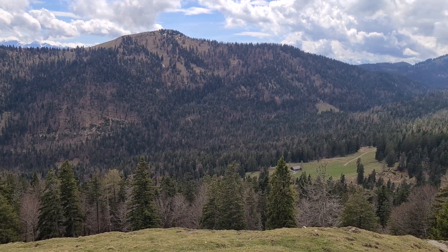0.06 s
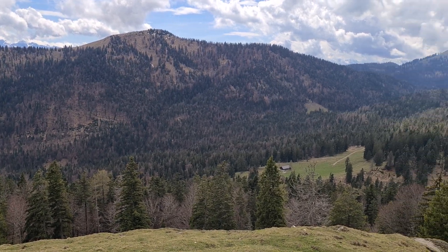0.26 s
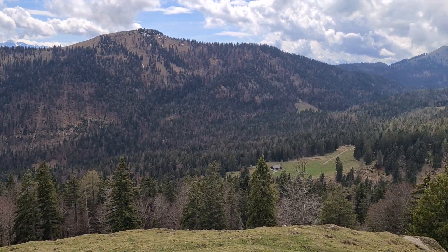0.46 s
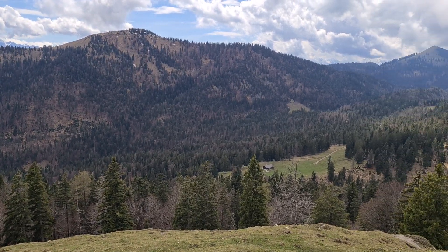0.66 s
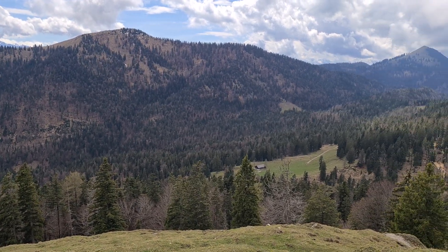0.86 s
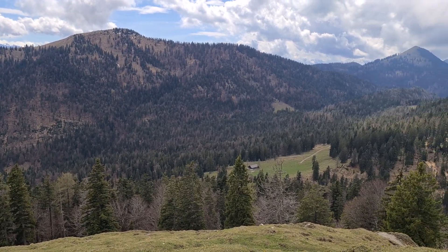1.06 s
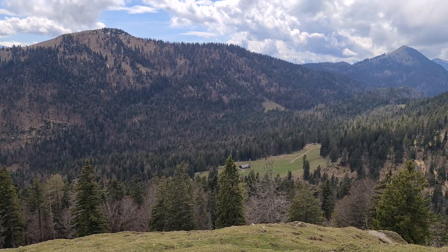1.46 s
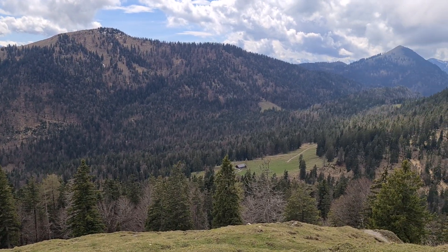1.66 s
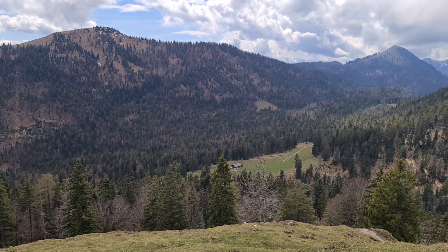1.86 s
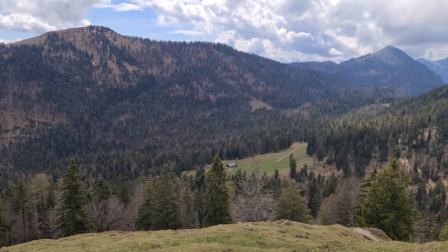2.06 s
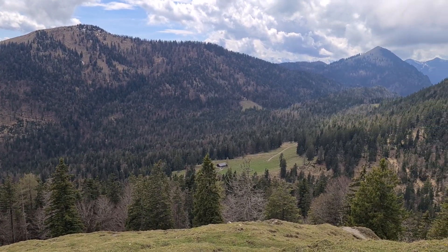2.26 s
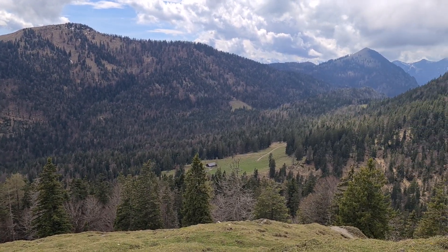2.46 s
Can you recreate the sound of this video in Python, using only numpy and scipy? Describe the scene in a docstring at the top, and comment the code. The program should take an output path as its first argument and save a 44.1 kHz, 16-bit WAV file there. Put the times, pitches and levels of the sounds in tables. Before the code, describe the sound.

Gusty wind rumbles and thumps on the microphone, with a few sharp clicks.

```python
"""An open mountainside. Wind gusts hit the two ports (sound openings) of a hand-held microphone,
mostly the left one, and make it rumble and thump. Three sharp clicks, some faint ticks, a few dull
knocks and a tiny crackle, probably from handling the casing, sound close to the right port.
Far away, a few small birds chirp faintly over the soft rush of the forest below and a steady hiss."""
import sys
import numpy as np
from scipy import signal
from scipy.fft import rfft, irfft
from scipy.io import wavfile
from scipy.ndimage import uniform_filter1d

SR = 44100
rng = np.random.default_rng(int(sys.argv[2]) if len(sys.argv) > 2 else 0)


def transcribe(signal):
    """Save signal, clipped to [-1, 1], as a 16-bit WAV file at the path in sys.argv[1]."""
    frames = np.atleast_2d(signal).T
    limited = np.clip(frames, -1, 1)
    pcm = np.round(limited * 32767).astype(np.int16)
    wavfile.write(sys.argv[1], SR, pcm)


N = 110250   # 2.5 seconds


def wind():
    """Gusts make each port rumble on its own; small swirls of air add a flutter on the left."""
    # How strong the rumble at each port and the flutter are over time: time_s, level_db
    left_gusts = [(0, -47.5), (.03, -37), (.11, -59.5), (.15, -51), (.185, -58), (.26, -64), (.305, -20),
                  (.335, -19.5), (.39, -35), (.53, -27), (.61, -28), (.7, -53.5), (.74, -41), (.79, -44),
                  (.86, -32), (.93, -36.5), (1.01, -33), (1.05, -21.5), (1.08, -20), (1.102, -49.5),
                  (1.125, -20.5), (1.155, -34), (1.22, -30.5), (1.31, -26.5), (1.46, -26.5), (1.55, -40),
                  (1.59, -31.5), (1.63, -32.5), (1.665, -41.5), (1.72, -23), (1.78, -50.5), (1.85, -22),
                  (1.97, -47), (2.07, -29), (2.18, -26.5), (2.22, -46.5), (2.33, -54.5), (2.36, -66),
                  (2.42, -53.5), (2.47, -66), (2.5, -69)]
    right_gusts = [(0, -49), (.24, -33), (0.329, -39), (.37, -51), (0.409, -32.5), (0.462, -37), (.51, -44),
                   (.6, -47.5), (.66, -30), (.71, -38.5), (.78, -37), (.83, -51.5), (.95, -37.5),
                   (1.13, -51.5), (1.21, -57), (1.33, -52), (1.37, -31.5), (1.44, -59), (1.49, -44),
                   (1.77, -54.5), (1.84, -42.5), (1.89, -46), (1.94, -32.5), (2.06, -69.5), (2.13, -37.5),
                   (2.2, -70), (2.29, -43), (2.32, -41.5), (2.36, -61), (2.42, -47), (2.47, -60),
                   (2.5, -69)]
    flutter_levels = [(0, -64), (.03, -75), (.07, -88), (.26, -92), (.32, -30.5), (.38, -39), (.47, -48.5),
                      (.59, -38), (.63, -74), (.7, -77), (.8, -71), (.86, -38.5), (.93, -79), (.97, -35.5),
                      (1.06, -36), (1.1, -66), (1.17, -28.5), (1.22, -94), (1.26, -37.5), (1.37, -38.5),
                      (1.41, -53.5), (1.45, -31.5), (1.54, -68), (1.59, -42.5), (1.67, -63), (1.715, -35),
                      (1.76, -82), (1.82, -47.5), (1.85, -36.5), (1.9, -78), (1.96, -78), (2.01, -46.5),
                      (2.06, -50), (2.085, -64), (2.11, -48), (2.19, -42.5), (2.24, -96), (2.5, -80)]
    # How strong their low and high pitches are: pitch_hz, level_db
    left_tone = [(15, -27.5), (30, -8.5), (50, -2), (68, -1.5), (95, -5), (130, -11.5), (190, -30),
                 (280, -42.5), (450, -63.5), (900, -100.5)]
    right_tone = [(15, -28), (30, -5.5), (50, -4), (68, 1.5), (92, -7.5), (120, -15.5), (190, -29),
                  (280, -51.5), (450, -59.5), (900, -98)]
    swirl_tone = [(50, -28), (100, 5.5), (160, 3), (230, -2.5), (320, -15), (450, -37.5), (650, -53),
                  (1100, -87)]
    left = level(left_gusts) * evened(noise(left_tone), share=1)
    right = level(right_gusts) * evened(noise(right_tone), share=1)
    swirls = evened(noise(swirl_tone), share=0.41)
    flicker = from_db(drift(rate_hz=56))   # about 1 dB up and down
    flutter = level(flutter_levels) * rms_one(swirls * flicker)
    return np.array([left + flutter, right])


def puffs():
    """Each puff of air pushes once on a port; a bigger swirl makes a rounder, duller thump."""
    # Single puffs: start_s, port (left or right), level_db, top_hz
    air_puffs = [(0.107, "right", 12, 158), (.13, "right", 3, 207), (.228, "right", 5, 186),
                 (0.323, "left", 11.5, 393), (0.345, "left", 3.5, 388), (0.406, "right", 7, 183),
                 (0.421, "left", -0.5, 361), (.443, "right", 10, 263), (0.527, "left", 13, 242),
                 (0.587, "left", 2.5, 331), (0.664, "right", 0.5, 188), (0.782, "right", -14.5, 473),
                 (0.974, "left", 7, 339), (1.035, "left", 1.5, 408), (1.071, "left", 8, 190),
                 (1.177, "left", -3.5, 320), (1.258, "left", 15.5, 212), (1.295, "left", 5, 268),
                 (1.344, "left", 0, 284), (1.362, "right", 4, 245), (1.452, "left", 11, 227),
                 (1.644, "right", -14, 472), (1.706, "left", 9.5, 261), (1.817, "right", -6.5, 275),
                 (1.939, "right", -9.5, 190), (2.069, "left", 15.5, 226), (2.103, "left", 9, 242),
                 (2.177, "left", 11, 215), (2.274, "right", -8, 310), (2.319, "right", -3, 230),
                 (2.417, "right", -9, 270)]
    pushes = np.zeros((2, N))
    for start_s, port, level_db, top_hz in air_puffs:
        side = int(port == "right")
        pushes[side] -= butter(impulses(start_s, level_db), top_hz, "low", order=6)
    return butter(pushes, hz=75, kind="high", order=2)


def clicks():
    """A hard tap snaps and makes the casing ring at two pitches for under a millisecond."""
    # Hard taps: start_s, snap_db, top_hz, ring_db, overtone_db
    taps = [(.2754, -14.5, 11100, -42, -34), (1.397, -31, 4500, -63, -79), (1.595, -29, 13800, -11.5, -28),
            (1.618, -47, 13900, -52, -45), (1.6971, -28, 5890, -22, -43)]
    # The casing's ring and its higher overtone: pitch_hz, width_hz
    casing_rings = [(6050, 1430), (11900, 5900)]
    contacts = sum(butter(impulses(start_s, snap_db), top_hz, "low", order=4)
                   for start_s, snap_db, top_hz, _, _ in taps)
    sound = butter(contacts, hz=[2570, 6850], kind="band", order=1)
    starts_s, _, _, ring_db, overtone_db = np.transpose(taps)
    for (pitch_hz, width_hz), level_db in zip(casing_rings, [ring_db, overtone_db]):
        ring = resonance(impulses(starts_s, level_db), pitch_hz, width_hz)
        sound -= resonance(ring, pitch_hz, width_hz)   # a second pass softens the ring's start
    return to_the_right(sound, left_db=-35)


def click_tails(click_sound):
    """A faint hiss lingers after each click."""
    # Tone of that hiss: pitch_hz, level_db
    tail_tone = [(1000, -6), (3000, -1.5), (6000, -10.5), (8000, -21), (10000, -10.5), (12000, -4.5),
                 (15500, 3)]
    left, right = (scattered(click_sound, tail_tone, fade_s=0.32) for _ in range(2))
    return from_db(-5.5) * np.array([from_db(-12) * left, right])


def knocks():
    """Soft bumps stir the low rings of the casing, which die out almost at once."""
    # Soft bumps: start_s, left_db, right_db, top_hz
    bumps = [(0.3606, -39, -15, 1800), (.385, -43, -10.5, 1440), (0.6651, -19, -11.5, 1700),
             (1.948, -50, -26.5, 2500)]
    # The rings they stir: pitch_hz, width_hz, level_db
    casing_rings = [(670, 340, -5), (1053, 320, -1.5), (3090, 3000, -6.5)]
    pushes = np.zeros((2, N))
    for start_s, left_db, right_db, top_hz in bumps:
        push = butter(impulses(start_s, 0), top_hz, "low", order=3)
        pushes += from_db([[left_db], [right_db]]) * push
    return -sum(from_db(level_db) * resonance(pushes, pitch_hz, width_hz)
                for pitch_hz, width_hz, level_db in casing_rings)


def crackle():
    """The grip slides on the casing in a few tiny, uneven slips, too soft to snap."""
    # The one short slide: start_s, length_s, level_db
    slide = (1.8131, .0042, -31)
    start_s, length_s, level_db = slide
    slips_per_s = 2000
    count = int(length_s * slips_per_s)
    times_s = start_s + length_s * (np.arange(count) + rng.random(count)) / count
    slips = impulses(times_s, level_db) * rng.choice([-1, 1], N)
    soft_slips = butter(slips, hz=5800, kind="low", order=8)
    sound = butter(soft_slips, hz=[900, 1800], kind="band", order=1)
    return to_the_right(sound, left_db=-27)


def birds():
    """Far birds sing thin, wavering tones that rise a little, swell and fade, blurred by the trees."""
    # Chirps: start_s, length_s, start_hz, end_hz, waver_hz, level_db
    chirps = [(.088, .028, 4230, 4290, 30, -70), (.96, .045, 3260, 3380, 120, -77),
              (1.0, .045, 3100, 3220, 170, -76), (1.045, .065, 3240, 3300, 190, -78.5)]
    t, song = np.arange(N) / SR, np.zeros(N)
    for start_s, length_s, start_hz, end_hz, waver_hz, level_db in chirps:
        progress = np.clip((t - start_s) / length_s, 0, 1)
        pitch_hz = start_hz + (end_hz - start_hz) * progress + waver_hz * drift(rate_hz=200)
        whistle = np.sqrt(2) * np.sin(2 * np.pi * np.cumsum(pitch_hz) / SR)
        swell = np.sin(np.pi * progress)
        song += from_db(level_db) * swell * whistle
    flat_tone = [(1, 0), (SR, 0)]   # the trees scatter all pitches alike
    left, right = (song + from_db(-2) * scattered(song, flat_tone, fade_s=0.35) for _ in range(2))
    return np.array([from_db(-1.5) * left, right])


def forest():
    """The far forest rushes smoothly, fading on the right as the microphone turns."""
    # Tone of the rush on each side: pitch_hz, level_db
    left_tone = [(100, -14), (400, -8), (620, -6.5), (820, 1), (1100, 2.5), (1400, 1), (1750, -4),
                 (2200, -9), (2700, -24.5), (6000, -56.5)]
    right_tone = [(100, -5), (400, -3.5), (620, -0.5), (800, -1.5), (1000, 4), (1350, -2), (1750, -4),
                  (2200, -7.5), (2700, -14.5), (6000, -47)]
    # Strength of the rush on the right: time_s, level_db
    right_levels = [(0, -61), (.6, -64), (.9, -66), (1.5, -67.5), (1.9, -69), (2.5, -67.5)]
    share, delay_s = 0.066, 0.00025   # this share of the right's power is the left's rush, a bit later
    t = np.arange(N) / SR
    left = noise(left_tone)
    delayed = np.interp(t - delay_s, t, left)
    right = np.sqrt(share) * delayed + np.sqrt(1 - share) * noise(right_tone)
    return np.array([from_db(-69.5) * left, level(right_levels) * right])


def hiss():
    """A steady high hiss, stronger on the right."""
    # Tone of the hiss on each side: pitch_hz, level_db
    left_tone = [(1000, -16), (2600, -1.5), (3500, 6), (4100, 3.5), (4800, 10.5), (5300, -13), (6600, 1.5),
                 (7800, -22), (10000, -15), (12500, -10.5), (16000, -17.5)]
    right_tone = [(1000, -9), (2600, -7), (3300, 3), (4750, 3.5), (5250, -1), (5800, 4), (6400, -4.5),
                  (7400, -23.5), (9000, -25.5), (11500, -15), (13500, -20), (16000, -22.5)]
    # Strength of the hiss on the right: time_s, level_db
    right_levels = [(0, -69), (1.2, -69.5), (2.5, -71)]
    return np.array([from_db(-81.5) * noise(left_tone), level(right_levels) * noise(right_tone)])


def from_db(db):
    """Turn decibels into a number to multiply a sound by."""
    return 10 ** (np.asarray(db) / 20)


def rms_one(x):
    """Scale a sound so that its average strength (rms) is 1."""
    return x / np.sqrt(np.mean(x ** 2) + 1e-20)


def level(curve):
    """A volume that glides through rows of time_s, level_db."""
    return from_db(np.interp(np.arange(N) / SR, *np.transpose(curve)))


def noise(tone):
    """Noise of strength 1, shaped by rows of pitch_hz, level_db."""
    pitch_hz, level_db = np.transpose(tone)
    all_hz = np.maximum(np.fft.rfftfreq(N, 1 / SR), 1)
    gains = from_db(np.interp(np.log(all_hz), np.log(pitch_hz), level_db))
    return rms_one(irfft(rfft(rng.standard_normal(N)) * gains, N))


def drift(rate_hz):
    """A random wander of about 1 either way; a higher rate wanders faster."""
    return rms_one(butter(rng.standard_normal(N + SR), rate_hz, "low", order=2)[SR:])


def evened(x, share, span_s=0.06):
    """Smooth away a share (0 to 1) of the slow swings in a noise's loudness."""
    power = np.abs(signal.hilbert(x)) ** 2
    for window_s in (span_s, span_s / 2):
        power = uniform_filter1d(power, int(window_s * SR))
    return rms_one(x / power ** (share / 2))


def butter(x, hz, kind, order):
    """Keep the low pitches, the high ones or a band; a higher order cuts more steeply."""
    return signal.sosfilt(signal.butter(order, hz, kind, fs=SR, output="sos"), x + 1e-18)


def resonance(x, pitch_hz, width_hz):
    """Ring at one pitch; the wider the ring, the sooner it dies."""
    decay = np.exp(-np.pi * width_hz / SR)
    feed = np.array([1, 0, -1]) * (1 - decay ** 2) / 2
    feedback = [1, -2 * decay * np.cos(2 * np.pi * pitch_hz / SR), decay ** 2]
    return signal.lfilter(feed, feedback, x + 1e-18)


def impulses(times_s, level_db):
    """One sharp spike at each given time."""
    spikes = np.zeros(N)
    spikes[np.round(times_s * SR).astype(int)] = from_db(level_db)
    return spikes


def scattered(x, tone, fade_s):
    """A blurred echo of a sound that falls by 60 dB in fade_s."""
    echo = noise(tone) * from_db(-60 * np.arange(N) / SR / fade_s)
    return signal.fftconvolve(x, echo / np.sqrt(np.sum(echo ** 2)))[:N]


def to_the_right(x, left_db):
    """Place a sound on the right by turning its left side down."""
    return np.array([from_db(left_db) * x, x])


def scene():
    """Wind and handling sounds up close, over the far background."""
    snaps = clicks()
    return (wind() + puffs() + knocks() + forest() + hiss() + birds()
            + snaps + click_tails(snaps[1]) + crackle())


def record(dry):
    """The very highest pitches are cut off steeply."""
    top_hz = 15900
    return signal.sosfilt(signal.ellip(10, .1, 80, top_hz, fs=SR, output="sos"), dry)


dry = scene()
out = record(dry)
transcribe(out)
```